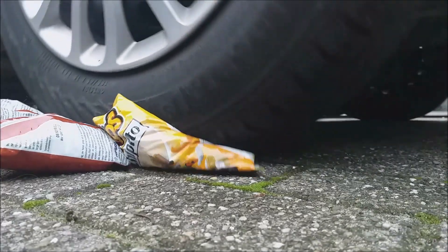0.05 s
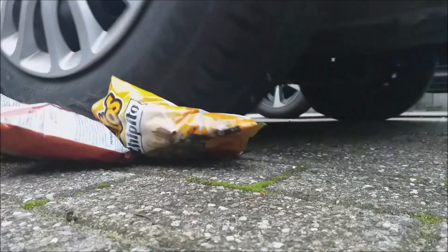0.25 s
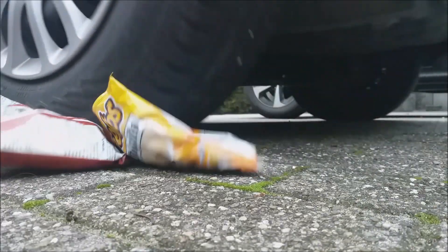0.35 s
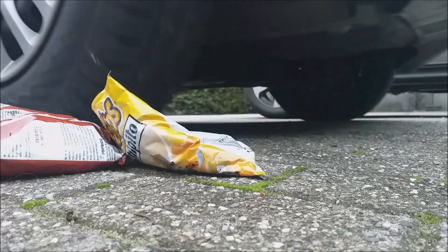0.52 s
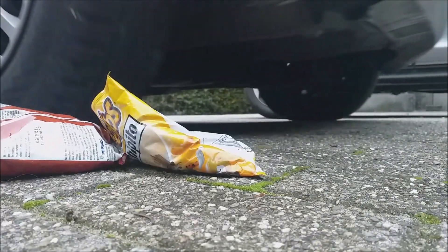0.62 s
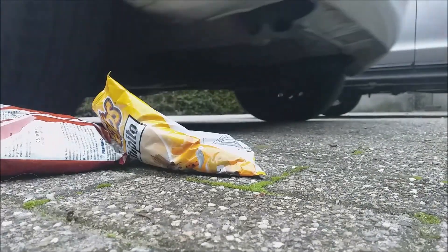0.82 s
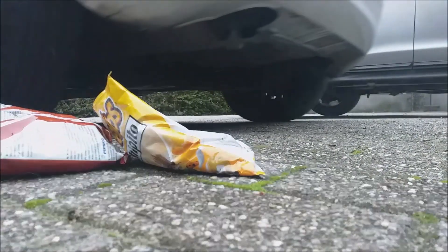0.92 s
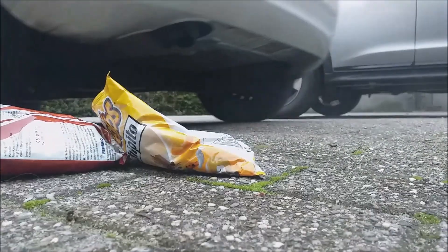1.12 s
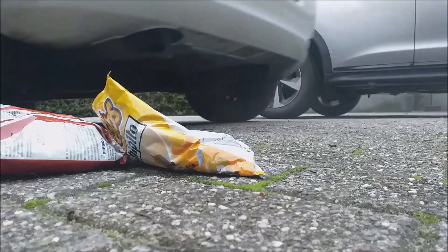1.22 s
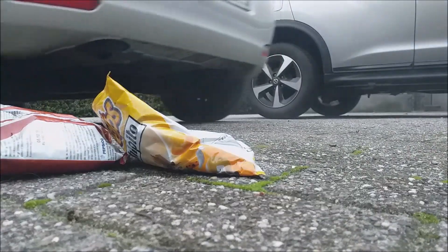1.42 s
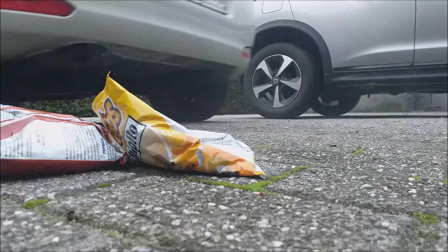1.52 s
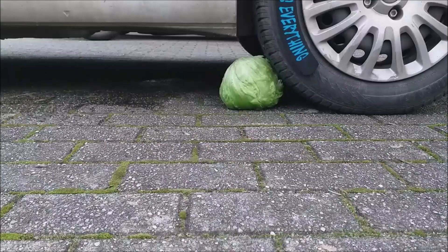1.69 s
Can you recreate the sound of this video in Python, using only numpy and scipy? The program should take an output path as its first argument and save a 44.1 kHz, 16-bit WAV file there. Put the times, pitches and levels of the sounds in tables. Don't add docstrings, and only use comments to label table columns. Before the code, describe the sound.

A foil snack packet crackles under a car tyre from the start, with dense bright snaps and a tiny rubbery squeak at 0.15 s, intensifying near 0.4. At 0.49 s it bursts: sharp crack, brief flap, short hollow echoes. Foil ticks thin out by 1.1 s over faint idling; revs rise slightly around 1.5 with a few more ticks. At 1.68 s it cuts away, then a very faint soft rustle enters at 1.74. Close, dry, outdoors, mono.

```python
import sys
import numpy as np
from scipy import signal
from scipy.fft import rfft, irfft
from scipy.io import wavfile

SR = 44100
rng = np.random.default_rng(int(sys.argv[2]) if len(sys.argv) > 2 else 0)


def dump_mix(stems):
    frames = np.atleast_2d(stems).T
    limited = np.clip(frames, -1, 1)
    pcm = np.round(limited * 32767).astype(np.int16)
    wavfile.write(sys.argv[1], SR, pcm)


def linear_from_db(decibels):
    return 10 ** (np.asarray(decibels, float) / 20)


N = 77175


def crackle():
    # time_s, level_db
    crush = [(0, -52), (.088, -52.5), (.151, -53.5), (.157, -73), (.164, -55), (.18, -50.5), (.25, -49),
             (.31, -51.5), (.39, -47.5), (.445, -48), (.455, -54.5), (.53, -51.5), (.6, -62.5),
             (.69, -71.5), (.77, -69.5), (.8, -82), (1.3, -94.5), (1.675, -75.5)]
    # frequency_hz, density_db (per Hz)
    foil_colour = [(150, -8), (400, -10), (640, -3.5), (900, -5), (2000, -4.5), (3840, -5.5), (7500, -10),
                   (16000, -18.5)]
    grains_per_s, grain_cycles, grain_spread_db = 2600, 11.0, 2.3
    grain_db, rustle_db = -3, -6

    level_db, = in_time(crush)
    clump = drift(66)
    signs = rng.choice([-1, 1], N)
    sizes = linear_from_db(grain_spread_db * np.minimum(rng.exponential(1, N), 4)) * signs
    born = rng.random(N) < grains_per_s * linear_from_db(2.5 * clump) / SR
    pitches_hz = np.geomspace(250, 15000, 24)
    dealt = rng.integers(0, 24, N)
    grains = 0
    for k, hz in enumerate(pitches_hz):
        clicks = sizes * born * (dealt == k)
        grains = grains + ring(clicks, hz, grain_cycles / hz) * hz ** 0.72
    rustle = colour(rng.standard_normal(N), foil_colour) * linear_from_db(1.5 * clump)
    return linear_from_db(level_db) * (linear_from_db(grain_db) * colour(grains, foil_colour) + linear_from_db(rustle_db) * rustle)


def snaps(table, cycles):
    level_db, edge_db = -3.5, 12
    rustle_db, rustle_decay_s = -4, .0013
    rustle_follows = .25
    length = 800
    out = np.zeros(N + SR)
    t = np.arange(length) / SR
    fade = np.exp(-t / rustle_decay_s)
    noises = rng.standard_normal((len(table), length))
    for (start_s, peak_db, hz, bright_db), white in zip(table, noises):
        tone = np.sin(2 * np.pi * hz * t) * linear_from_db(-60 * t * hz / cycles) * (1 - np.exp(-t * hz))
        rustle = rms_one(band_pass(white * fade, hz / 3, min(3.5 * hz, 8300)))
        rustle = rustle * linear_from_db(rustle_db + rustle_follows * (bright_db + 23.5))
        edge = linear_from_db(edge_db + bright_db) * rms_one(high_pass(white * fade, 8500, order=4))
        snap = tone + (rustle + edge) * .5 * np.sqrt(np.mean(fade ** 2))
        i = int(start_s * SR)
        out[i:i + length] += linear_from_db(peak_db + level_db) * snap / np.abs(snap).max()
    return out[:N]


def crushing_snaps():
    # start_s, peak_db, pitch_hz, brightness_db
    crush_snaps = [(0.0162, -34.9, 7470, -24.1), (0.0238, -38.4, 1740, -25.3), (0.027, -36.2, 5040, -27.0),
                   (0.0332, -32.4, 2970, -24.8), (0.0374, -35.5, 4180, -27.2), (0.0455, -36.1, 4970, -23.5),
                   (0.0564, -36.0, 5320, -19.3), (0.0598, -38.0, 4500, -30.4), (0.0724, -33.7, 3770, -32.2),
                   (0.0958, -35.7, 2050, -24.3), (0.1058, -35.3, 5640, -31.5), (0.1109, -38.6, 5100, -25.6),
                   (0.1156, -32.9, 4220, -35.6), (0.1229, -38.2, 3470, -18.8), (0.1334, -32.7, 5530, -28.9),
                   (0.1417, -36.6, 3510, -25.9), (0.1704, -37.5, 1740, -27.6), (0.1759, -33.3, 4540, -27.4),
                   (0.1955, -35.8, 1460, -29.2), (0.2083, -32.1, 4290, -32.0), (0.2127, -33.6, 2890, -31.9),
                   (0.2185, -33.4, 3980, -27.0), (0.2343, -36.4, 3880, -26.0), (0.2473, -33.4, 3810, -26.5),
                   (0.256, -32.5, 2780, -27.5), (0.2614, -33.0, 5340, -24.7), (0.2814, -36.6, 1510, -28.3),
                   (0.2856, -36.7, 5580, -25.9), (0.3051, -37.0, 2280, -27.3), (0.3288, -35.6, 4780, -25.7),
                   (0.3367, -34.7, 2760, -22.7), (0.3442, -32.7, 4010, -27.6), (0.3527, -32.6, 3900, -27.6),
                   (0.3576, -35.0, 3140, -29.1), (0.3627, -34.3, 1870, -24.7), (0.3719, -35.9, 5100, -14.1),
                   (0.3786, -32.7, 3960, -17.5), (0.3816, -34.2, 2800, -18.8), (0.3858, -32.4, 2450, -29.3),
                   (0.389, -29.9, 2540, -32.1), (0.395, -30.9, 2500, -27.9), (0.3998, -27.6, 2560, -31.9),
                   (0.4027, -34.0, 3960, -25.5), (0.4137, -32.2, 8180, -15.7), (0.4278, -30.4, 4330, -19.2),
                   (0.4325, -30.0, 7450, -17.8), (0.4361, -32.1, 3770, -24.1), (0.4397, -32.6, 2280, -30.1),
                   (0.444, -29.0, 5100, -29.7)]
    # start_s, peak_db, pitch_hz, brightness_db
    seam_snaps = [
        (.4758, -35, 3600, -30),
        (.4894, -26, 4250, -20),
        (.4901, -28, 7800, -16),
        (.4958, -36, 5700, -24),
        (.4988, -30, 2500, -30),
        (.5006, -33, 3400, -28),
        (.5033, -38, 5000, -26),
        (.5275, -42, 5200, -26),
    ]
    return snaps(crush_snaps + seam_snaps, cycles=11.0)


def squeak():
    start_s, length_s, pitch_hz = .142, .027, 1735
    squeak_db, octave_db = -55.5, -1
    groan_length_s, groan_hz, groan_db = .012, 740, -53.5
    t = np.arange(N) / SR - start_s

    def swell(length):
        arch = np.sin(np.pi * np.clip(t / length, 0, 1))
        return np.sqrt(np.clip(arch, 0, 1))

    phase = 2 * np.pi * pitch_hz * t
    tone = np.sin(phase) + linear_from_db(octave_db) * np.sin(2 * phase + 1)
    groan = linear_from_db(groan_db) * swell(groan_length_s) * np.sin(2 * np.pi * groan_hz * t)
    return groan + linear_from_db(squeak_db) * swell(length_s) * tone


def pop():
    # frequency_hz, level_db, t60_s
    hollow_modes = [(135, -31.5, 0.063), (190, -43, 0.029), (304.6, -28, 0.041), (341.6, -40.5, 0.093),
                    (467, -35.5, 0.05), (733, -42.5, 0.093), (878, -33.5, 0.068), (2536, -42.5, 0.059)]
    # delay_s, level_db
    echo_table = [
        (.0075, -24),
        (.0165, -26),
        (.0225, -19),
        (.031, -32),
        (.046, -32),
    ]
    # frequency_hz, level_db, t60_s
    tail_table = [(200, -46.5, 0.23), (597, -49.5, 0.36), (1260, -43, 0.15), (2470, -37.5, 0.051),
                  (5100, -51, 0.14), (12000, -47, 0.042)]
    pop_s, tear_gap_s, tear_db = .4892, .0011, -25
    crack_db, crack_attack_s, crack_decay_s = -28.5, .0008, .0017
    flap_hz, flap_db, flap_attack_s, flap_hold_s, flap_release_s = 680, -20.5, .004, .0052, .0009
    hollow_delay_s, thump_below_hz = .0101, 250
    t = np.arange(N) / SR - pop_s + .0004
    after = np.maximum(t, 0)
    white = rng.standard_normal((2, N))

    flap_rise = (t > 0) * np.clip(0.59 + 0.2 * t / flap_attack_s, 0, 1)
    flap_fall = np.exp(-np.maximum(t - flap_hold_s, 0) / flap_release_s)
    flap = linear_from_db(flap_db) * flap_rise * flap_fall * np.sin(2 * np.pi * flap_hz * t)
    crack = linear_from_db(crack_db) * np.clip(t / crack_attack_s, 0, 1) * white[0] * np.exp(-after / crack_decay_s)
    direct = flap + crack
    direct[[int((pop_s - .0001) * SR), int((pop_s + tear_gap_s) * SR)]] += 2 * linear_from_db(tear_db)

    dull = signal.lfilter([.4], [1, -.6], direct)
    echoes = 0
    for k, (delay_s, db) in enumerate(echo_table):
        echoes = echoes + linear_from_db(db) * (-1) ** k * np.roll(dull, int(delay_s * SR))

    click = np.zeros(N)
    click[int(pop_s * SR)] = 1
    hollow = 0
    for hz, db, t60 in hollow_modes:
        delay = int(hollow_delay_s * SR) * (hz > thump_below_hz)
        hollow = hollow + linear_from_db(db) * ring(np.roll(click, delay), hz, t60)

    edges_hz = 100 * 2 ** np.arange(0, 7.4, .5)
    tail = 0
    for k, (low, high) in enumerate(zip(edges_hz, edges_hz[1:])):
        hz = np.sqrt(low * high)
        band = rms_one(band_pass(white[k % 2], low, high))
        tail = tail + band * linear_from_db(at_hz(tail_table, hz) - 60 * after / at_hz(tail_table, hz, axis=2))
    tail = tail * linear_from_db(2.4 * drift(42)) * np.clip(t / 0.0042, 0, 1)
    return high_pass(direct + echoes + hollow + tail, 180)


def relaxing_ticks():
    # start_s, peak_db, pitch_hz, brightness_db
    tick_table = [(.5377, -40, 860, -30), (.551, -41, 710, -27), (.5595, -42, 1340, -27),
                  (.5637, -41, 7490, -26), (.5832, -44, 4800, -26), (.5974, -39.5, 4600, -27),
                  (.6168, -50, 3960, -22), (.6216, -47, 5900, -27), (.6334, -50, 4500, -26),
                  (.6487, -47, 3920, -20), (.6652, -39, 2450, -29), (.6707, -50, 2840, -30),
                  (.6744, -55, 2350, -32), (.6874, -55, 1740, -32), (.6934, -57, 4200, -17),
                  (.7085, -57, 5000, -26), (.72, -54, 2950, -29), (.7295, -55, 1400, -28),
                  (.7505, -59, 4500, -16), (.7565, -49.5, 2090, -21), (.7631, -53.5, 4890, -21),
                  (.7706, -50, 1310, -30), (.7749, -57, 5000, -30), (.8225, -62, 3100, -32),
                  (.849, -60, 3100, -32), (.8633, -51.5, 1900, -41), (.874, -63, 6200, -30),
                  (.8845, -54, 2150, -33), (.927, -54, 1310, -36), (1.0155, -62, 6000, -28),
                  (1.03, -61, 4600, -30), (1.0424, -54, 2000, -36), (1.056, -62, 3000, -34),
                  (1.0976, -57, 1920, -40), (1.1207, -61, 970, -38), (1.4664, -62, 1200, -40),
                  (1.4738, -58, 1700, -31), (1.5027, -56, 2400, -26), (1.5471, -49.5, 1460, -25),
                  (1.5505, -60, 7000, -20), (1.6012, -50, 7410, -19), (1.6045, -55, 7400, -20),
                  (1.6281, -57, 1800, -36), (1.6569, -58, 3450, -36)]
    return linear_from_db(-2) * snaps(tick_table, cycles=9.0)


def engine():
    # time_s, firing_hz, level_db, load_db
    idle = [
        (0, 84.1, -70.5, -1),
        (.55, 83.73, -69, 2.5),
        (.8, 83.8, -69.5, -0.5),
        (1.3, 83.6, -72, 0.5),
        (1.5, 87.7, -74, 5),
        (1.68, 87.8, -74.5, 10.5),
    ]
    # multiple (of firing rate), level_db
    orders = [(.5, -22.5), (.75, -27), (1, 2), (1.25, -24.5), (1.5, -9), (1.75, -27), (2, -14), (2.25, -29),
              (2.5, -16.5), (2.75, -26.5), (3, -9), (3.25, -13), (3.5, -15.5), (3.75, -9.5), (4, -23.5),
              (4.25, -13), (4.5, -15), (4.75, -10.5), (5, -29.5), (5.25, -25.5), (5.5, -17), (5.75, -26),
              (6, -26), (6.25, -19.5)]
    pipe_hz, pipe_width_hz, pipe_db = 385.7, 18.8, 10.5
    wobble_db, wander_rad = 1.3, .35
    firing_hz, level_db, load_db = in_time(idle)
    turn = 2 * np.pi * np.cumsum(firing_hz) / SR
    hum = 0
    for (order, db), start in zip(orders, 2 * np.pi * rng.random(len(orders))):
        order = np.round(4 * order) / 4
        lift_db = pipe_db / (1 + ((order * firing_hz - pipe_hz) / pipe_width_hz) ** 2)
        half_db = load_db * (order % 1 == .5)
        height = linear_from_db(db + lift_db + half_db + wobble_db * drift(7.9))
        wander = wander_rad * np.sqrt(order) * drift(2.2)
        hum = hum + height * np.sin(order * turn + start + wander)
    return np.sqrt(2) * linear_from_db(level_db) * hum


def street():
    # frequency_hz, level_db
    panels = [(1200, -89), (1880, -86.5), (3300, -94)]
    # frequency_hz, density_db (per Hz)
    air_colour = [(25, -0.5), (60, 7.5), (150, -1), (400, 0), (550, -1.5), (1740, -10), (7500, -20.5),
                  (16000, -32)]
    white = rng.standard_normal(N)
    bay = 0
    for hz, db in panels:
        bay = bay + linear_from_db(db + 3 * drift(20)) * rms_one(ring(white, hz, 12 / hz))
    air = linear_from_db(-77.5 + 1.5 * drift(15)) * colour(rng.standard_normal(N), air_colour)
    return bay + air


def rms_one(x):
    return x / np.sqrt(np.mean(x ** 2) + 1e-20)


def in_time(rows):
    s, *columns = np.transpose(rows)
    return [np.interp(np.arange(N) / SR, s, c) for c in columns]


def at_hz(points, hz, axis=1):
    points = np.array(points)
    return np.interp(np.log(hz), np.log(points[:, 0]), points[:, axis])


def bin_hz():
    return np.maximum(np.arange(N // 2 + 1) * SR / N, 10)


def colour(x, spectrum):
    hz = bin_hz()
    below = np.minimum(hz / spectrum[0][0], 1) ** 2
    return rms_one(irfft(rfft(x) * linear_from_db(at_hz(spectrum, hz)) * below, N))


def high_pass(x, hz, order=2):
    return signal.sosfilt(signal.butter(order, hz, "high", fs=SR, output="sos"), x)


def band_pass(x, low, high):
    return signal.sosfilt(signal.butter(2, [low, high], "band", fs=SR, output="sos"), x)


def drift(rate):
    r = np.exp(-2 * np.pi * rate / SR)
    return rms_one(signal.lfilter([1], [1, -2 * r, r * r], rng.standard_normal(N + SR))[SR:])


def ring(clicks, hz, t60):
    r, w = linear_from_db(-60 / (t60 * SR)), 2 * np.pi * hz / SR
    return signal.lfilter([0, np.sin(w)], [1, -2 * r * np.cos(w), r * r], clicks + 1e-18)


def scene():
    foil = crackle() + crushing_snaps() + squeak() + pop() + relaxing_ticks()
    return (foil + engine() + street())[None]


def band_limit(x):
    return signal.sosfilt(signal.butter(12, 16820, fs=SR, output="sos"), x)


def record(dry):
    # frequency_hz, gain_db
    mic_colour = [(20, 0), (8000, 1), (8700, -8), (10500, -2.5), (15700, 4), (16000, -25.5), (16900, -38)]
    # frequency_hz, density_db (per Hz)
    rustle_colour = [(250, 4), (500, -1), (3000, -19.5), (16000, -33)]
    change_s, residue_db, fade_db_per_s = 1.678, -25, 500
    rustle_s, rustle_attack_s, rustle_db = 1.738, .014, -82.5
    t = np.arange(N) / SR
    residue = linear_from_db(residue_db - fade_db_per_s * (t - change_s)) * high_pass(dry, 150)
    rise = np.clip((t - rustle_s) / rustle_attack_s, 0, 1)
    rustle = linear_from_db(rustle_db) * rise * colour(rng.standard_normal(N), rustle_colour)
    mix = np.where(t < change_s, dry, residue) + rustle
    mix = irfft(rfft(mix) * linear_from_db(at_hz(mic_colour, bin_hz())), N)
    return band_limit(mix)


dry = scene()
out = record(dry)
dump_mix(out)
```